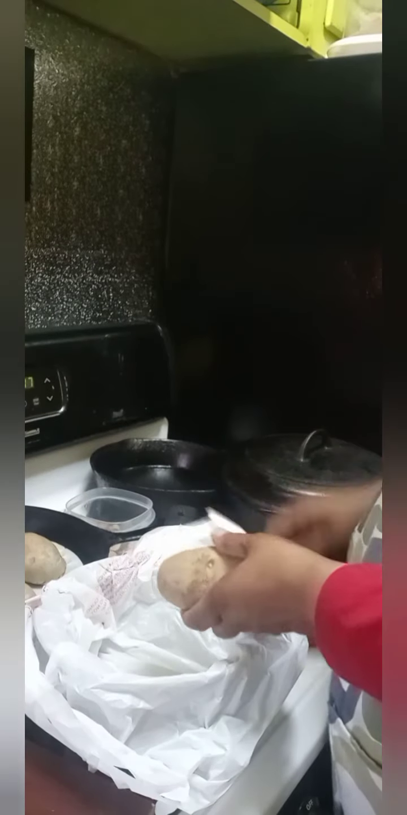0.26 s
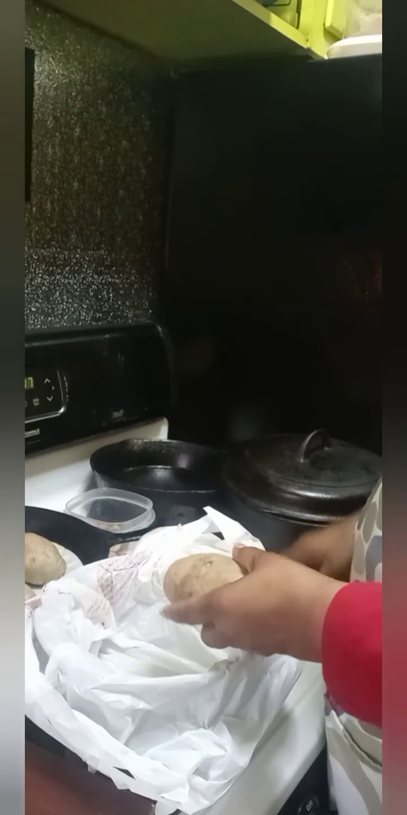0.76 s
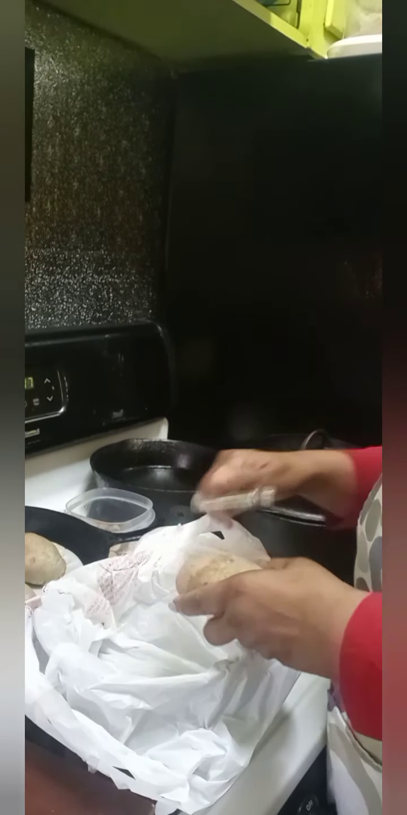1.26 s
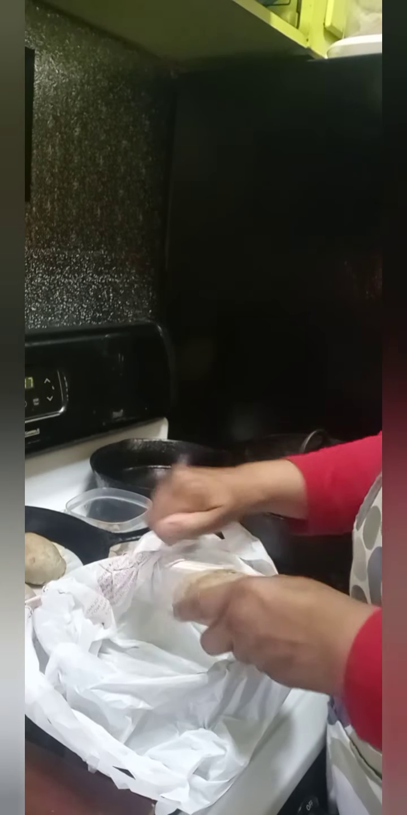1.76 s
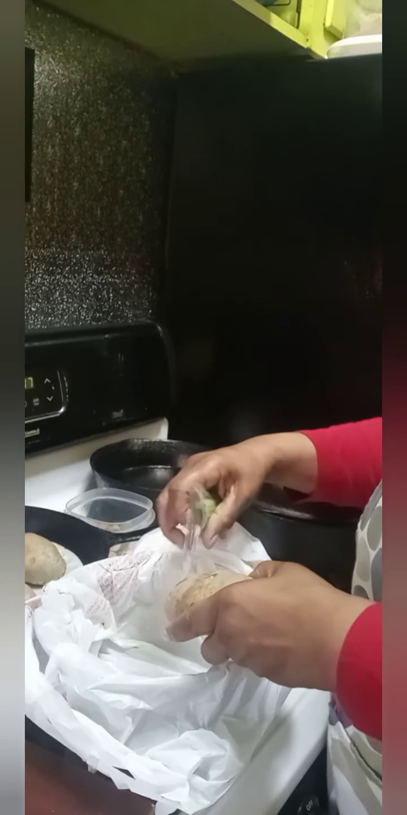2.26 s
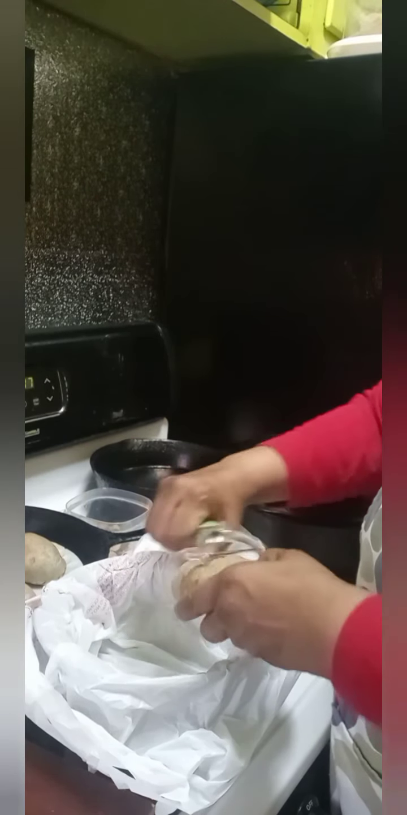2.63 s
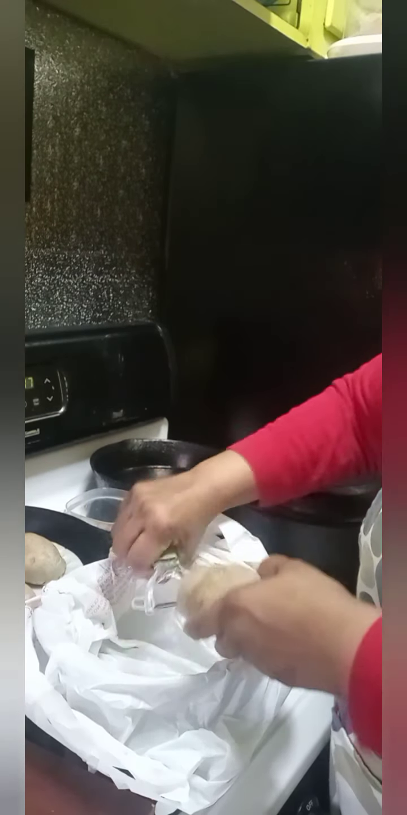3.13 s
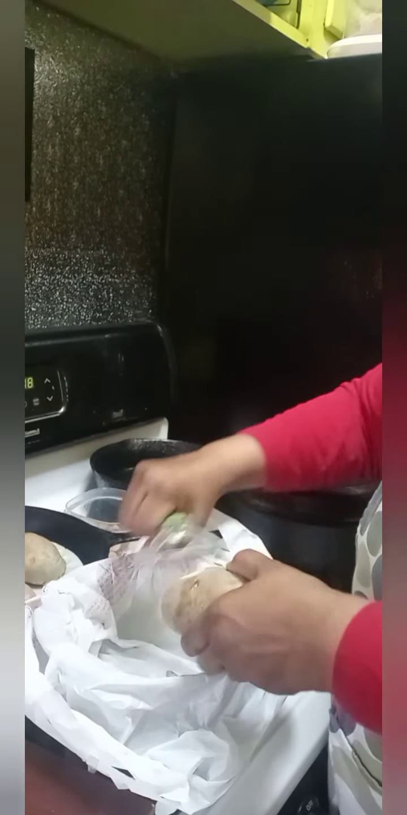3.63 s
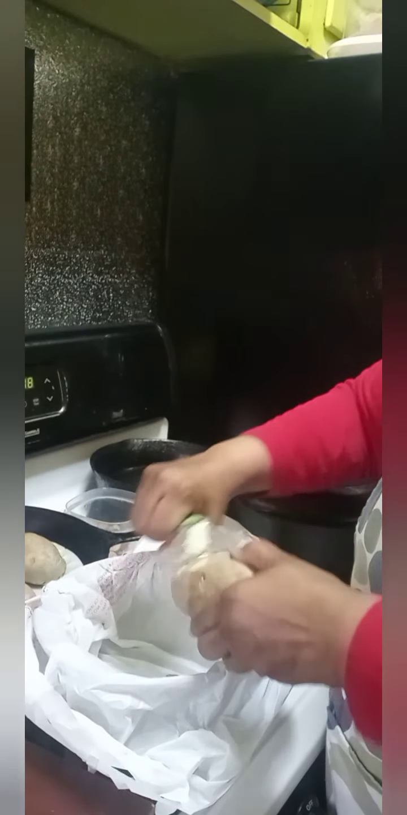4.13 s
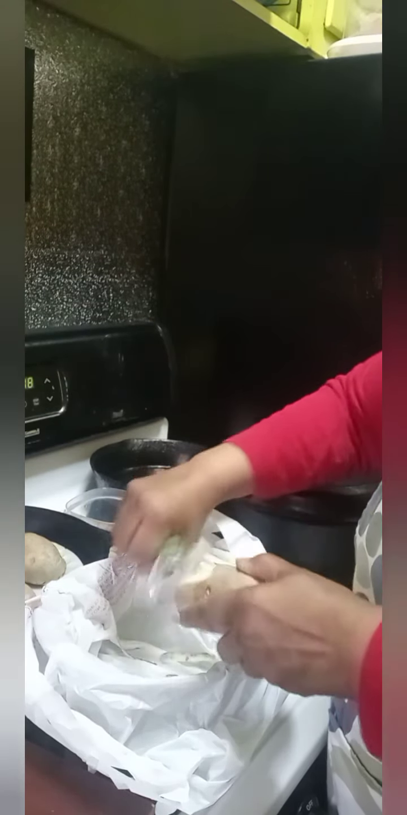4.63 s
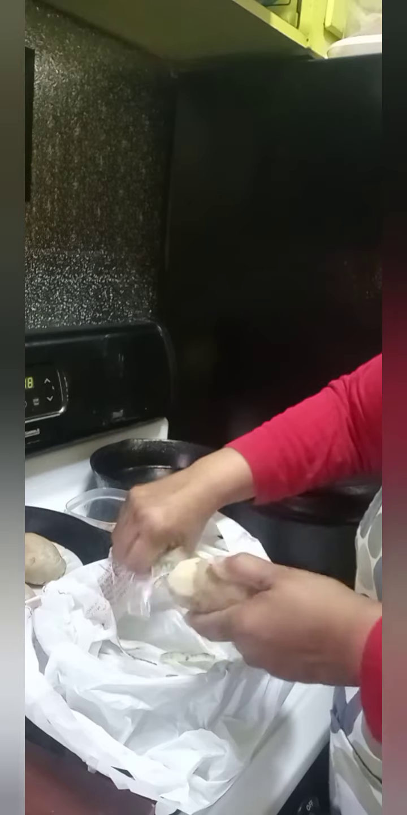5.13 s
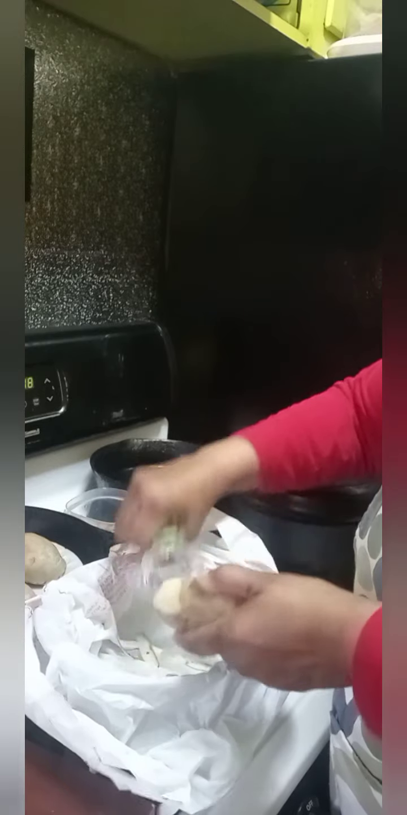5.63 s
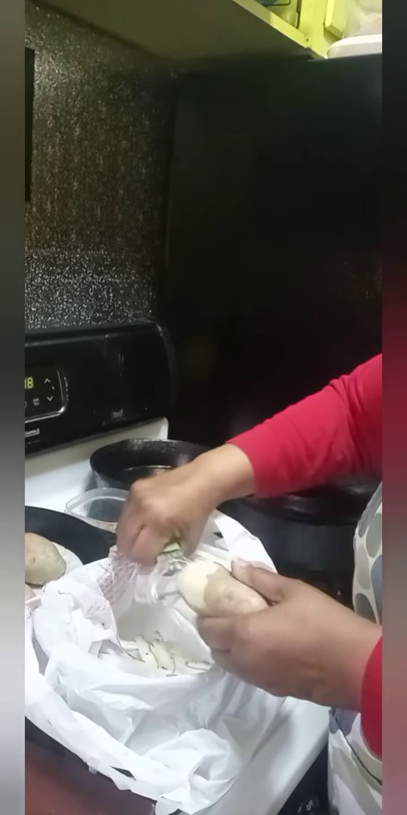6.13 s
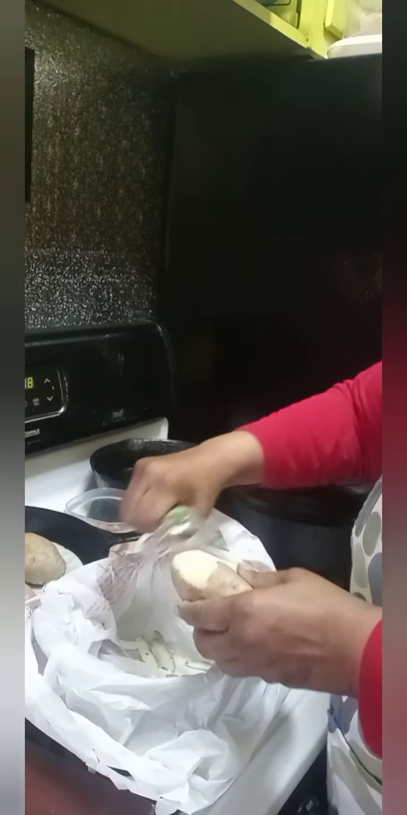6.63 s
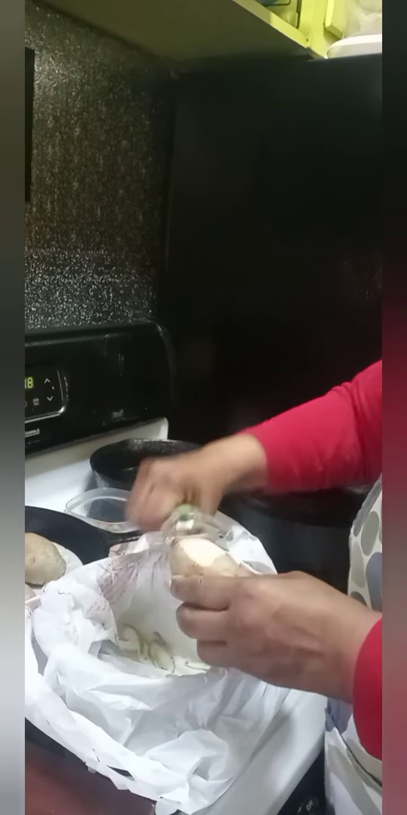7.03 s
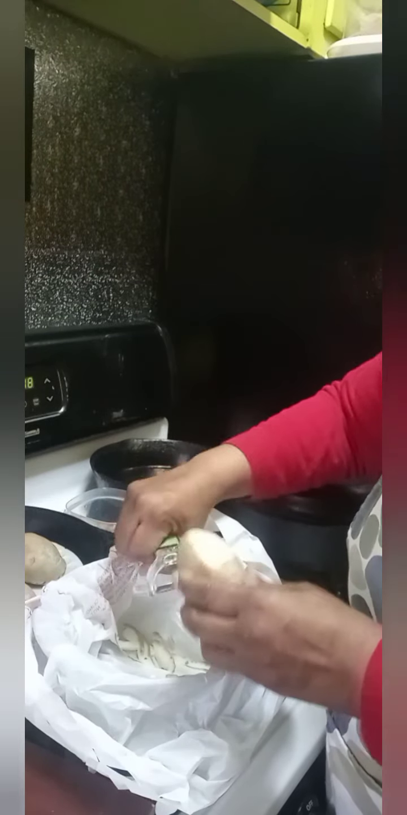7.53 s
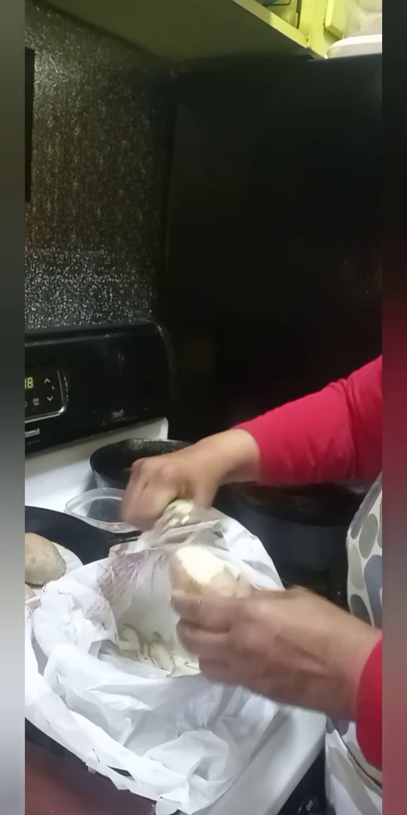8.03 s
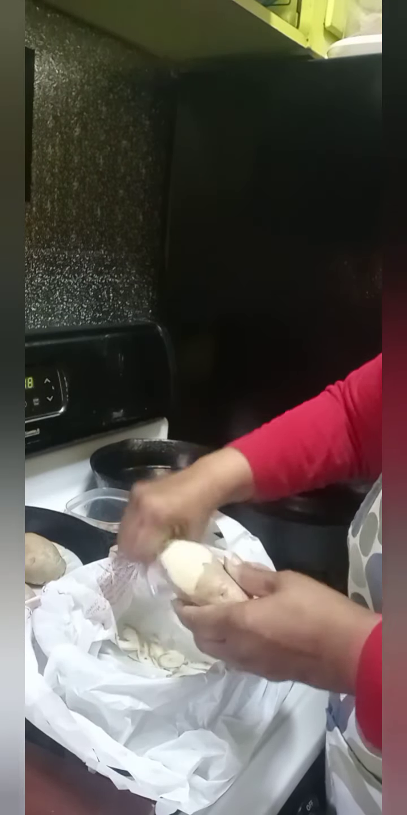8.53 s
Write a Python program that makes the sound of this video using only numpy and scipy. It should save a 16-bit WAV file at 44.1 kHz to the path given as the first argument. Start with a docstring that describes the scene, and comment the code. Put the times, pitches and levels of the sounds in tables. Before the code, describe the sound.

Close, nearly mono sound of hand peeling beside a stove. A fan-like hum drones steadily underneath. First come light bag crackles and a sharp double knock on the worktop, then a pause. Crisp, dry scrapes follow, each started by a small metallic tick of the swivelling blade, at about three a second at times. One bright, rattling pan clang interrupts them; afterwards the quick scraping continues to the end amid plastic crackles.

```python
"""A potato is peeled by hand over a plastic bag that lines a pan, on the stove of a small kitchen.
A motor hums all the while: wavering sine tones, and shaped noise for the air in its duct.
From the start the bag crinkles in bursts of tiny clicks; soon a utensil knocks on the worktop (short noise).
Then the swivel blade ticks as it lands and rasps through the skin (clumps of clicks); peel drops on the bag.
Later a stroke slips and clangs on the pan: fading sine tones and a noisy rattle. Peeling goes on."""
import sys
import numpy as np
from scipy import signal
from scipy.fft import rfft, irfft, next_fast_len
from scipy.io import wavfile
from scipy.ndimage import uniform_filter1d, map_coordinates

SR = 44100
rng = np.random.default_rng(int(sys.argv[2]) if len(sys.argv) > 2 else 0)


def generate_wav(sig):
    """Save sig (samples, or channels by samples) to the path in sys.argv[1] as 16-bit PCM at SR."""
    pcm = np.round(np.clip(np.atleast_2d(sig).T, -1, 1) * 32767).astype(np.int16)
    wavfile.write(sys.argv[1], SR, pcm)


N = 387198  # length of the scene in samples
T = np.arange(SR // 2) / SR  # time within one event, half a second


def amp(db):
    """Turn decibels into a gain."""
    return 10 ** (np.asarray(db) / 20)


def unit(x):
    """Scale to rms 1."""
    return x / np.sqrt(np.mean(x ** 2) + 1e-20)


def along(points, hz):
    """Read a curve of (f/Hz, value) points on a log frequency axis."""
    f, value = np.transpose(points)
    return np.interp(np.log(hz + 1), np.log(f), value)


def wobble(rate, size=N):
    """Draw a smooth random curve through `rate` random points a second."""
    knots = rng.standard_normal(int(size * rate / SR) + 4)
    return map_coordinates(knots, [np.arange(size) * rate / SR])


def filtered(x, gain):
    """Pass x through a gain that is a function of frequency."""
    size = next_fast_len(x.shape[-1] + 8192)
    spectrum = rfft(x, size) * gain(np.fft.rfftfreq(size, 1 / SR))
    return irfft(spectrum, size)[..., :x.shape[-1]]


def coloured(x, gain):
    """Colour an event without sounding ahead of it; white noise keeps its power."""
    size = 2048
    shape = unit(gain(np.fft.rfftfreq(size, 1 / SR)))
    # folding the cepstrum makes a filter that only acts forward in time
    cepstrum = irfft(np.log(np.maximum(shape, 1e-5)))
    cepstrum[1:size // 2] *= 2
    cepstrum[size // 2 + 1:] = 0
    response = irfft(np.exp(rfft(cepstrum)))
    return signal.fftconvolve(x, response)[:len(x)]


def patchy(x, depth_db, bands, frames):
    """Let the colour of x drift: random gains smoothed over some bands and frames."""
    z = signal.stft(x, nperseg=512)[2]
    field = rng.standard_normal(z.shape)
    field = uniform_filter1d(field, bands, -2)
    field = uniform_filter1d(field, frames, -1)
    gains = unit(amp(depth_db * unit(field)))
    return signal.istft(z * gains, nperseg=512)[1][..., :x.shape[-1]]


def grains(rate, spread_db):
    """Tiny fractures, about `rate` a second, at random moments and of random sizes, rms 1."""
    chance = rng.random(len(T))
    size = rng.standard_normal(len(T))
    push = rng.standard_normal(len(T))
    return unit((chance < rate / SR) * amp(spread_db * np.clip(size, -2, 2)) * np.sign(push))


# how long the room rings on: (f/Hz, time to fall by 60 dB/s)
ROOM_DECAY = [(200, 0.34), (1500, 0.29), (6000, 0.22), (15000, 0.18)]


def in_kitchen(x, near_db, near_t60, room_db):
    """Mid and side of an event: direct sound, quick echoes off stove and wall, and the room's tail."""
    hz, t, z = signal.stft(rng.standard_normal((2, SR // 2)), SR, nperseg=256)
    fade = amp(-60 * t / along(ROOM_DECAY, hz)[:, None])
    tail = signal.istft(z * fade, SR, nperseg=256)[1][:, :SR // 2]
    near = rng.standard_normal(tail.shape) * amp(-60 * T / near_t60)
    response = amp(near_db) * near / np.linalg.norm(near[0])
    response += amp(room_db) * tail / np.linalg.norm(tail[0])
    response[0, 0] += 1  # direct sound, in the middle only
    response /= np.linalg.norm(response[0])
    return signal.fftconvolve(x[None], response, axes=1)[:, :len(x)]


def add(track, s, sound):
    """Lay a sound into a track at time s."""
    part = track[:, max(round(s * SR), 0):][:, :sound.shape[1]]
    part += sound[:, :part.shape[1]]


# hum tones of the motor: (f/Hz, middle level of the wavering amplitude/dB)
HUM_TONES = [(118.4, -58.5), (231.5, -51), (355.3, -65.5)]
# colour of the droning air: (f/Hz, relative level/dB)
DRONE_COLOUR = [(25, -53), (55, -45), (85, -28.5), (97, -30), (110, -8), (150, -8), (190, -9), (222, -3),
                (265, -7.5), (330, -15), (470, -13.5), (550, -25), (600, -23.5), (690, -33), (820, -31),
                (1050, -64.5), (1800, -120)]
# colour of the hiss: (f/Hz, relative level/dB)
HISS_COLOUR = [(470, -36.5), (800, -15), (896, -3), (965, -12.5), (1000, -17), (1150, -20.5), (1680, -22),
               (1970, -29.5), (2840, -29.5), (4180, -30), (4460, -27), (6650, -21), (9330, -32.5),
               (13400, -25), (16000, -27.5)]
# air resonances of the duct: (f/Hz, width/Hz, middle level of the wavering noise/dB)
DUCT_RESONANCES = [(237, 56, -57), (157, 46, -55), (593.7, 26, -69), (881.4, 35, -68), (954, 13, -71)]


def motor():
    """Wavering hum lines, air droning through a duct, and a faint restless hiss."""
    noise = lambda gain: unit(filtered(rng.standard_normal((2, N)), gain))
    drone = noise(lambda hz: amp(along(DRONE_COLOUR, hz)))
    hiss = patchy(noise(lambda hz: amp(along(HISS_COLOUR, hz))), depth_db=2.5, bands=12, frames=20)
    air = amp(-46.5) * drone + amp(-63.0 + 1.4 * wobble(4.7)) * hiss
    for centre, width, db in DUCT_RESONANCES:
        resonance = noise(lambda hz: 1 / (1 + (2 * (hz - centre) / width) ** 2))
        air += amp(db + 2 * wobble(4)) * resonance
    t = np.arange(N) / SR
    for hz, db in HUM_TONES:
        drift = hz / 300 * wobble(12)  # the higher lines stray further
        air += amp(db + 3.5 * wobble(6.2)) * np.sin(2 * np.pi * hz * t + drift)
    return air


# clear crinkles of the bag: (t/s, level setting/dB, time to fall by 60 dB/s)
BAG_CRINKLES = [(.074, -58.5, .19), (.361, -44.5, 0.34), (.909, -49, 0.17), (3.275, -51, 0.36),
                (3.42, -51.5, 0.32), (4.007, -54.5, .13), (4.08, -56, 0.12), (4.797, -43.5, 0.12),
                (6.335, -44, .17), (6.36, -45.5, 0.29), (6.427, -47.5, 0.23)]
# each strip brushes the bag this long after its cut: delay, level setting, time to fall by 60 dB
FALL_S, FALL_DB, FALL_FADE_S = .08, -68, .2


def bag():
    """Thin plastic buckles in a burst of bright crackles, faintly under every falling strip."""
    track = np.zeros((2, N))
    # (f/Hz, relative level/dB)
    film_colour = [(900, -17.5), (2800, -8.5), (6000, 2.0), (10000, -2.0), (15000, -4.0)]
    film = lambda hz: amp(along(film_colour, hz))
    falls = [(s + bite + hold + FALL_S, FALL_DB, FALL_FADE_S) for s, _, _, bite, hold, _, _ in PEELER_PULLS]
    for s, db, fade in list(BAG_CRINKLES) + falls:
        crackle = patchy(grains(rate=1100, spread_db=3), depth_db=3, bands=5, frames=8)
        crackle = crackle * amp(db - 60 * T / fade)
        add(track, s, amp(2.5) * in_kitchen(coloured(crackle, film), near_db=-7, near_t60=0.14, room_db=-5.0))
    return track


# the utensil on the worktop: (t/s, level setting/dB, where the treble starts to fall f/Hz)
UTENSIL_KNOCKS = [(.524, -42.5, 4000), (0.548, -36, 1800), (0.56, -39, 1500), (.668, -17.5, 12000),
                  (.673, -16, 7000), (.782, -35, 2780)]
# colour of the board: (f/Hz, relative level/dB)
BOARD_COLOUR = [(100, -24.5), (250, -9), (400, -11), (620, -8), (850, -1), (1050, -4.5), (1450, -10),
                (2200, -12.5), (3300, -8), (4800, -12), (6400, -8), (9000, -16), (16000, -19.5)]


def worktop():
    """Short dense knocks of fading noise; each has its own brightness."""
    track = np.zeros((2, N))
    for s, db, bright_hz in UTENSIL_KNOCKS:
        blow = rng.standard_normal(len(T)) * amp(-60 * T / 0.077)
        board = lambda hz: amp(along(BOARD_COLOUR, hz)) / np.hypot(1, hz / bright_hz)
        knock = coloured(blow, board)
        add(track, s, amp(db + 1) * in_kitchen(knock, near_db=-2, near_t60=0.089, room_db=-7.5))
    return track


# dull bumps that go into stove and worktop: (t/s, level setting/dB, f/Hz)
PANEL_BUMPS = [(0.556, -40.5, 121), (.672, -33.5, 250.7), (5.661, -34, 122), (5.725, -37.5, 219.3),
               (5.749, -34, 113)]


def bumps():
    """Heavy panels swell softly into a few low cycles that die away."""
    track = np.zeros((2, N))
    for s, db, hz in PANEL_BUMPS:
        swell = 1 - np.exp(-(T / 0.0067) ** 2)
        thump = np.sin(2 * np.pi * hz * T) * amp(db + 9 - 60 * T / 0.16) * swell
        add(track, s, in_kitchen(thump, near_db=-3.5, near_t60=0.053, room_db=-16.5))
    return track


# pulls of the peeler, each a tick as the blade lands and then a cut; bag() also times the falling peel by it:
# (landing t/s, tick level/dB, low ring setting of the tick/dB, time to full bite/s, hold/s,
#  cut level setting/dB, depth of the rasp as low boost/dB)
PEELER_PULLS = [(1.714, -38.5, -19, 0.2, 0.0055, -41, -1.5), (2.705, -30.5, -8, 0.12, 0.013, -39.5, 2),
                (3.079, -31, -6, 0.051, 0.081, -40, 0), (3.445, -35, -18, 0.034, 0.095, -40, -1.5),
                (3.817, -23.5, -17, 0.063, 0.051, -37.5, -3), (4.198, -27.5, -9.5, 0.045, 0.089, -41, -5.5),
                (4.544, -26.5, -33, 0.14, 0.041, -39.5, -3.5), (4.995, -36.5, 1, 0.061, 0.095, -39, -5),
                (5.48, -20, -7.5, 0.062, 0.047, -37.5, -7), (6.13, -43, -3, 0.038, 0.056, -38.5, 0.5),
                (7.141, -30.5, -3, 0.086, 0.0077, -43, -1.5), (7.508, -28, -1, 0.057, .022, -39, -3),
                (7.848, -37, 1, 0.058, 0.013, -36.5, -0.5), (8.167, -41.5, -2, 0.067, 0.02, -38, -5.5),
                (8.529, -35.5, 3.5, 0.067, 0.014, -41.5, 0.5)]
# the free blade flips on its pivot: (t/s, level/dB, low ring setting/dB)
BLADE_FLIPS = [(3.471, -31, 0), (3.502, -20, -21), (4.78, -37.5, -20), (5.854, -25.5, -20),
               (6.809, -47, 0.5), (7.072, -35.5, -15.5)]
# colour of the steel: (f/Hz, relative level/dB)
STEEL_COLOUR = [(650, -44), (1100, -13.5), (1650, -27.5), (2130, -6.5), (2440, -10.5), (3690, -4.5),
                (4880, -4.5), (6680, -0.5), (8360, -8), (10000, -6.5), (10800, -13), (13800, -10.5),
                (16000, -17)]


def blade():
    """The loose blade strikes its stops; the hand damps it at once, and each grip colours it anew."""
    track = np.zeros((2, N))
    for s, db, low_db, *_ in list(PEELER_PULLS) + list(BLADE_FLIPS):
        snap = patchy(rng.standard_normal(len(T)), depth_db=2, bands=5, frames=10)
        snap = snap * amp(-60 * T / 0.032) * (1 - np.exp(-T / 0.001))
        # the low ring is set below about 4200 Hz
        steel = lambda hz: amp(along(STEEL_COLOUR, hz) + (low_db + 11.0) / (1 + (hz / 4200) ** 4))
        add(track, s, amp(db) * in_kitchen(coloured(snap, steel), near_db=1.0, near_t60=0.13, room_db=0.0))
    return track


# colour of the cut skin: (f/Hz, relative level/dB)
SKIN_COLOUR = [(600, -32.5), (1000, -13), (1350, -13.5), (1650, -12.5), (2200, -10.5), (2700, -6),
               (4000, -3), (5200, -5), (7000, 0.5), (8500, -8), (9900, -3.5), (11000, -12.5), (13500, -5.5),
               (16000, -9)]


def rasp(pressure, depth_db, ring_hz):
    """The edge snaps through cells in uneven clumps; a deeper cut rasps lower."""
    cells = grains(rate=2000, spread_db=1.5) * amp(0.95 * wobble(141.7, len(T)))
    # the curling strip of peel shifts the resonances: here, a random drift of colour
    cells = patchy(cells, depth_db=3, bands=5, frames=5)
    strip = lambda hz: (4.5 + np.maximum(depth_db, 0) / 2) / (1 + ((hz - ring_hz) / 330) ** 2)
    depth = lambda hz: depth_db / (1 + (hz / 4500) ** 4)
    skin = lambda hz: amp(along(SKIN_COLOUR, hz) + strip(hz) + depth(hz))
    cut = coloured(cells * pressure, skin)
    return amp(1.04) * in_kitchen(cut, near_db=2, near_t60=0.04, room_db=-4.5)


RELEASE_S = 0.075  # time to fall by 60 dB as the strip comes free


def release_db(end):
    """The rasp dies once the edge leaves the potato."""
    return -60 * np.maximum(T - end, 0) / RELEASE_S


# quick flicks that chip off a scrap:
# (t/s, length/s, level setting/dB, depth of the rasp as low boost/dB, resonance f/Hz)
SCRAP_FLICKS = [(1.729, 0.016, -43, 19, 1690), (2.262, 0.035, -40, -10.5, 6300),
                (4.529, 0.074, -39.5, 4.5, 4760), (5.358, 0.056, -34.5, -4, 6900),
                (5.623, .039, -35, -2, 5500), (6.523, 0.039, -38, -4, 3270), (6.85, 0.027, -43.5, 1, 11500),
                (6.941, 0.044, -34, -4, 5300), (7.357, 0.016, -34, 2, 6660),
                (8.033, 0.019, -43.5, -9, 7000), (8.365, 0.04, -36.5, -6.5, 6630),
                (8.7, 0.019, -32.5, 0, 4200)]
# a pull swells by BITE_DB from landing to full bite, then grows as the hand leans on
BITE_DB, LEAN_DB_PER_S = 41, 19
STRIP_HZ = 3060  # resonance of the long strip that a pull lifts
# a flick starts hard and loses this much on its way
FLICK_ATTACK_S, FLICK_FADE_DB = 0.0092, 5.5


def peeling():
    """A pull sinks in, holds and comes free; a flick starts hard and fades."""
    track = np.zeros((2, N))
    for s, _, _, bite, hold, db, depth_db in PEELER_PULLS:
        bite_db = BITE_DB * np.minimum(T / bite - 1, 0)
        lean_db = LEAN_DB_PER_S * (np.clip(T - bite, 0, hold) - hold / 2)
        pressure = amp(db + bite_db + lean_db + release_db(bite + hold))
        add(track, s, rasp(pressure, depth_db, STRIP_HZ))
    for s, length, db, depth_db, ring_hz in SCRAP_FLICKS:
        contact = 1 - np.exp(-(T / FLICK_ATTACK_S) ** 2)
        fade_db = -FLICK_FADE_DB * np.minimum(T / length, 1)
        pressure = contact * amp(db + fade_db + release_db(length))
        add(track, s, rasp(pressure, depth_db, ring_hz))
    return track


# blows on the pan, for its ring and its rattle: (t/s, level setting/dB, where the treble starts to fall f/Hz)
PAN_BLOWS = [(5.656, -25.5, 4000), (5.668, -25.5, 2990), (5.686, -30.5, 2000), (5.711, -17.5, 14000),
             (5.718, -12, 14000), (5.732, -14.5, 7000), (5.744, -12.5, 3500), (5.755, -22.5, 3000)]
# modes, the tones the pan rings at: (f/Hz, relative level/dB, time to fall by 60 dB/s)
PAN_MODES = [(328, -12, 0.2), (505, -14.5, 0.7), (621, -9, 0.14), (757, -12, 0.25), (1184, -14, 0.24),
             (1312, -6, 0.23), (1370, -6, 0.21), (1661, -3, 0.14), (2035, -15, 0.24), (2284, -12, 0.38),
             (2356, -4, 0.14), (2717, -3.8, 0.5), (3117, -12, 0.22), (3273, -12, 0.17), (3608, -3, 0.17),
             (4129, -4, 0.18), (4413, -6, 0.2), (4500, -12, 0.18), (5265, -15, 0.29), (5538, -4, 0.24),
             (5750, -12, 0.19), (6511, -7, 0.3), (6714, 2, 0.17), (7000, -14, 0.19), (7833, -18, 0.24),
             (8216, -11, 0.27), (9160, -20, 0.21)]


def pan_ring():
    """Every blow feeds energy into the pan's modes and jogs their phase; a dull blow spares the high ones."""
    s, db, bright_hz = np.transpose(PAN_BLOWS)
    at, t = np.round(s * SR).astype(int), np.arange(N) / SR
    ring = np.zeros(N)
    for hz, mode_db, t60 in PAN_MODES:
        strength = amp(db + mode_db + rng.normal(0, 1, len(s))) ** 2 / (1 + (hz / bright_hz) ** 4)
        blows = np.bincount(at, strength, N)
        energy = signal.lfilter([1], [1, -amp(-60 / (t60 * SR)) ** 2], blows + 1e-20)
        jog = np.cumsum(np.bincount(at, rng.normal(0, 0.63, len(s)), N))
        # round off the sudden steps
        size, phase = uniform_filter1d(np.array([np.sqrt(energy), jog]), size=64)
        ring += size * np.sin(2 * np.pi * (hz * t + rng.random()) + phase)
    return amp(-7.5) * in_kitchen(ring, near_db=-22, near_t60=.05, room_db=-22)


# colour of the pan's rattle: (f/Hz, relative level/dB)
RATTLE_COLOUR = [(70, -32.5), (170, -13), (700, -8), (1400, -8.5), (3000, -5.5), (6600, -4), (10000, -10),
                 (16000, -20)]


def pan_rattle():
    """The struck pan chatters on the stove as short noise, shaped by peaks at its modes."""
    track = np.zeros((2, N))
    mode_hz = np.array(PAN_MODES)[:, :1]
    peaks = lambda hz: np.max(1 / (1 + ((hz - mode_hz) / (30 + .012 * mode_hz)) ** 2), axis=0)
    # gain that fills the gaps between the modes: (f/Hz, gain)
    gap_fill = [(1000, .7), (1500, .22), (7000, .22), (10000, .7), (14000, 1)]
    between = lambda hz: along(gap_fill, hz)
    for s, db, bright_hz in PAN_BLOWS:
        colour = lambda hz: amp(along(RATTLE_COLOUR, hz)) / np.hypot(1, hz / bright_hz)
        body = lambda hz: colour(hz) * (peaks(hz) + between(hz))
        rattle = coloured(rng.standard_normal(len(T)) * amp(-60 * T / 0.062), body)
        add(track, s, amp(db) * in_kitchen(rattle, near_db=-4, near_t60=0.081, room_db=3.0))
    return track


# how far the sound spreads to the sides: (f/Hz, gain of the side signal/dB)
STEREO_SPREAD = [(2900, -71), (3700, -27), (8000, -18), (13000, -8.5)]


def scene():
    """Everything is close to the centre; only the treble spreads."""
    mid, side = motor() + bag() + worktop() + bumps() + blade() + peeling() + pan_ring() + pan_rattle()
    side = filtered(side, lambda hz: amp(along(STEREO_SPREAD, hz)))
    return np.array([mid + side, mid - side])


TOP_HZ = 16100  # nothing is left above this


def record(dry):
    """The treble fades out over the last 200 Hz below the band limit."""
    return filtered(dry, lambda hz: np.clip((TOP_HZ - hz) / 200, 0, 1))


dry = scene()
out = record(dry)
generate_wav(out)
```